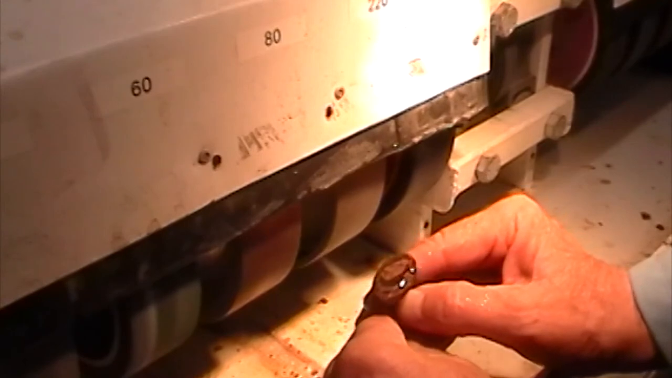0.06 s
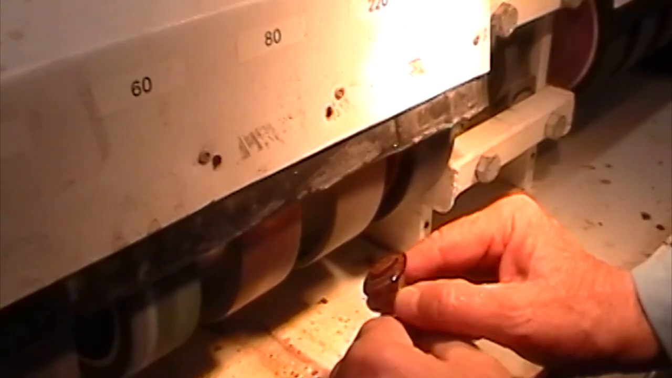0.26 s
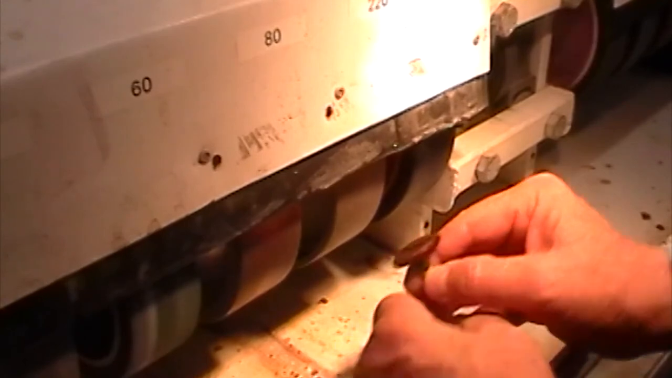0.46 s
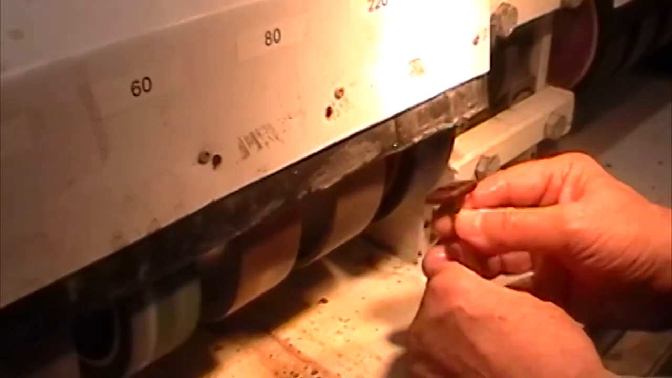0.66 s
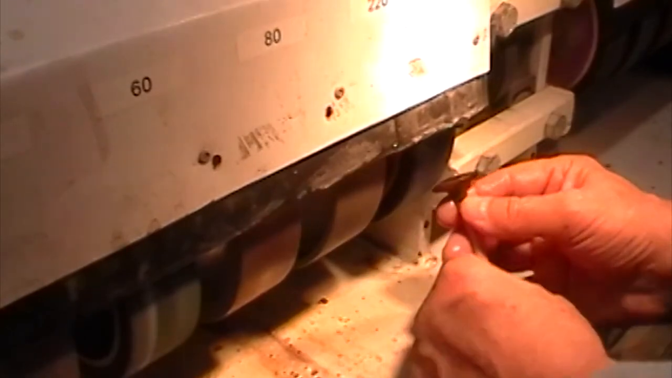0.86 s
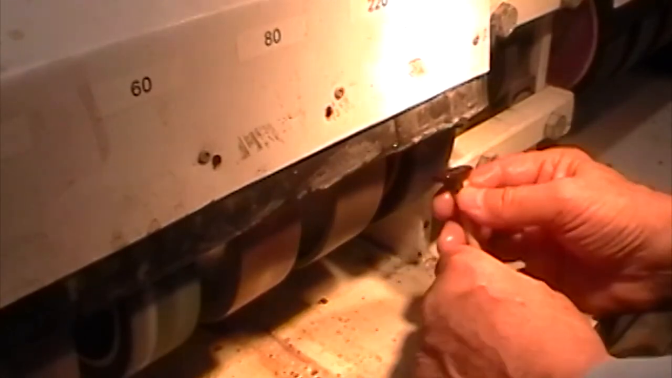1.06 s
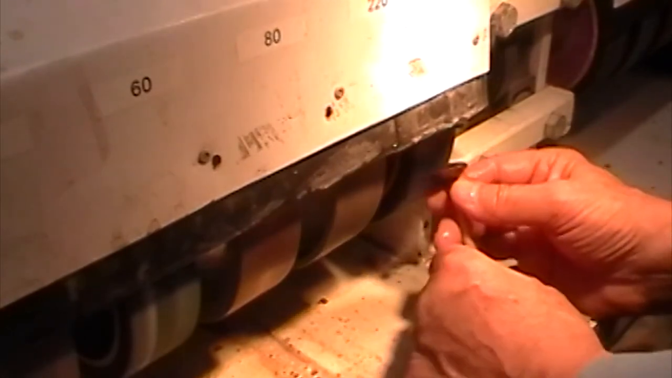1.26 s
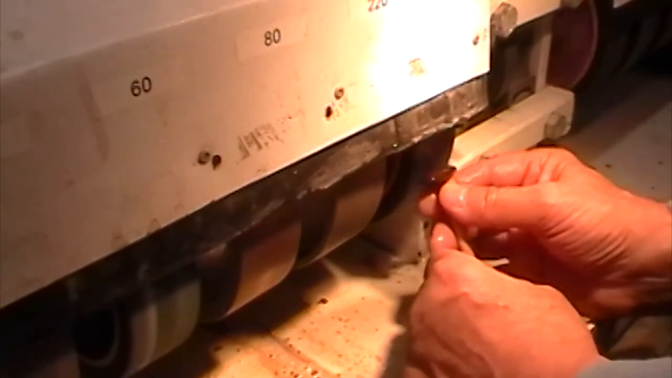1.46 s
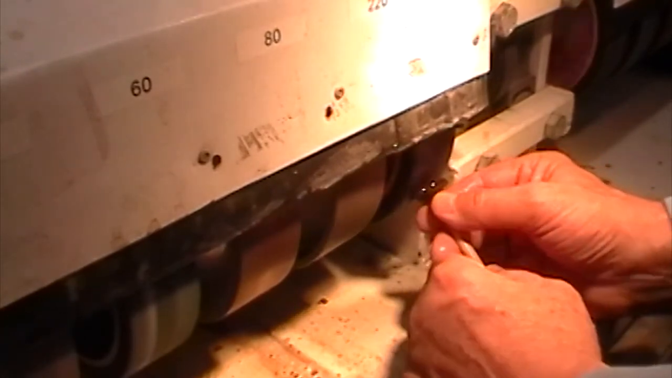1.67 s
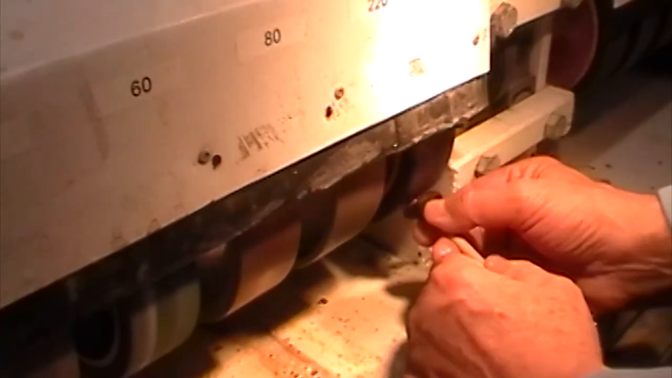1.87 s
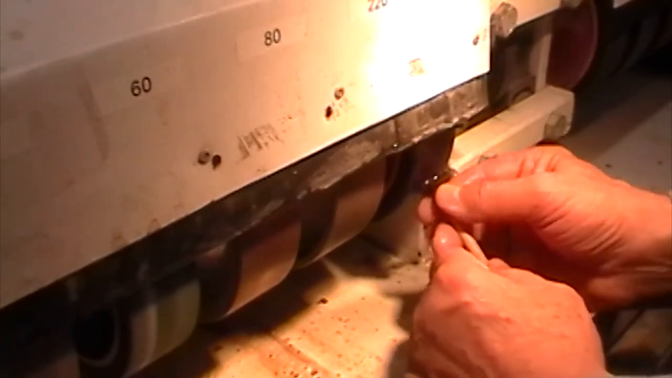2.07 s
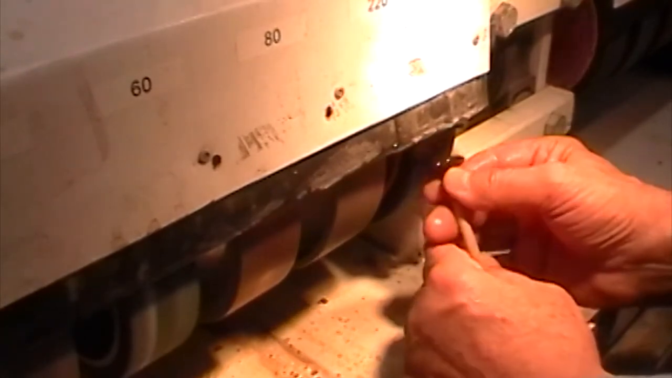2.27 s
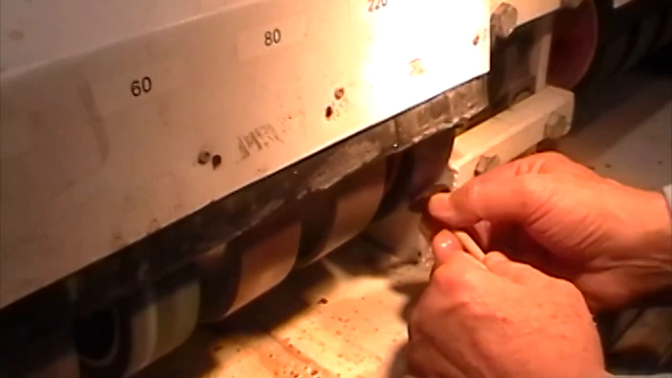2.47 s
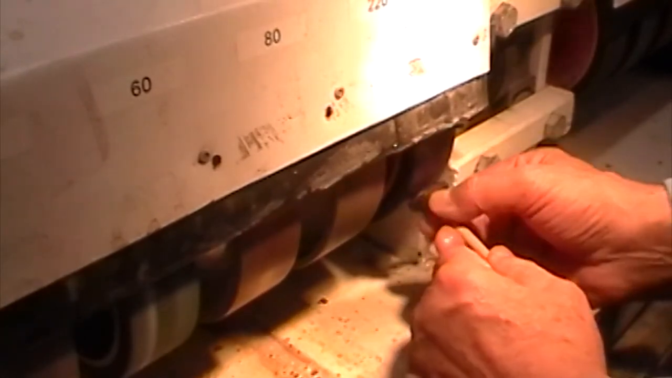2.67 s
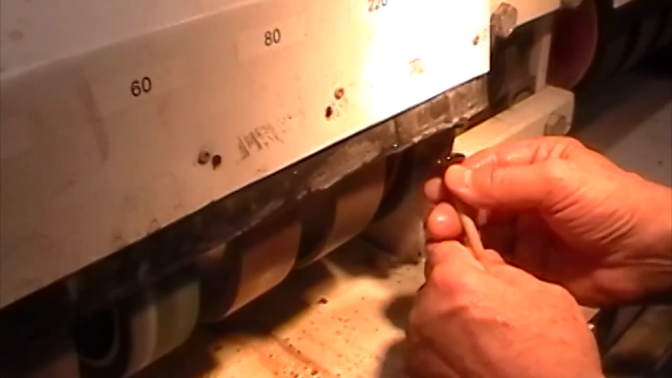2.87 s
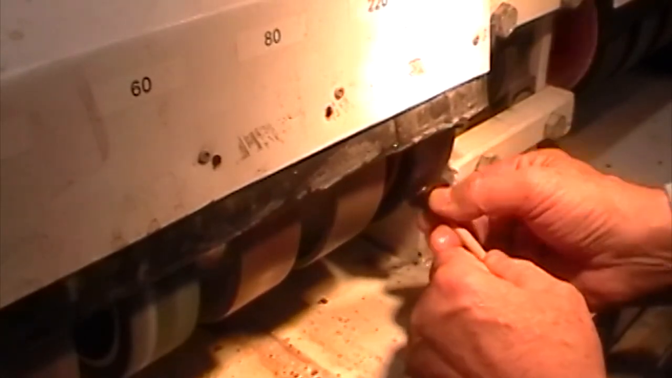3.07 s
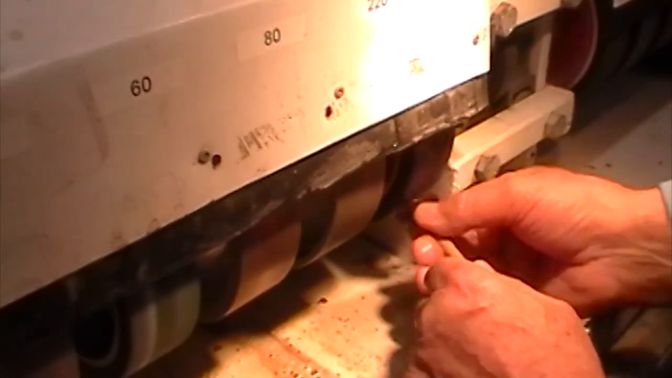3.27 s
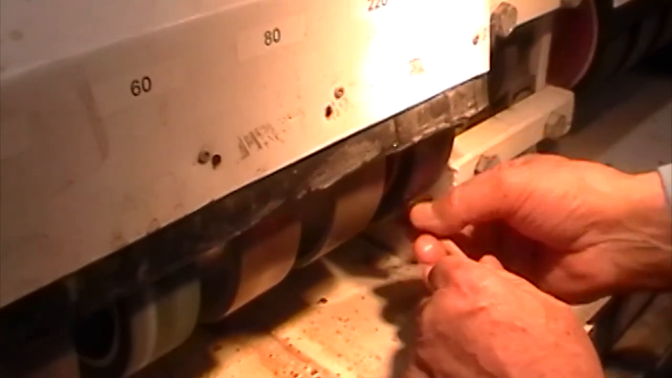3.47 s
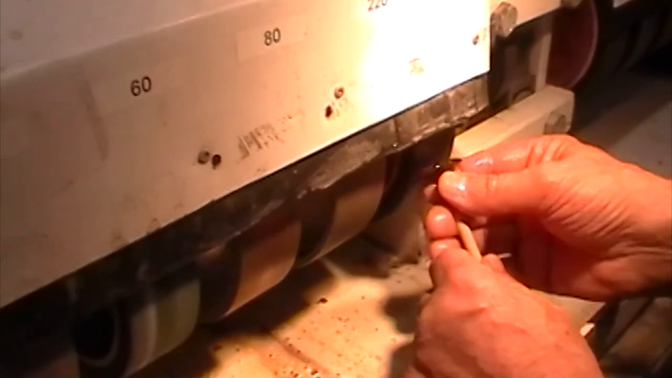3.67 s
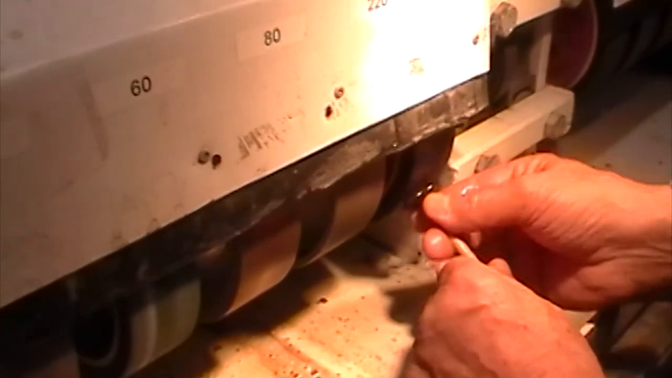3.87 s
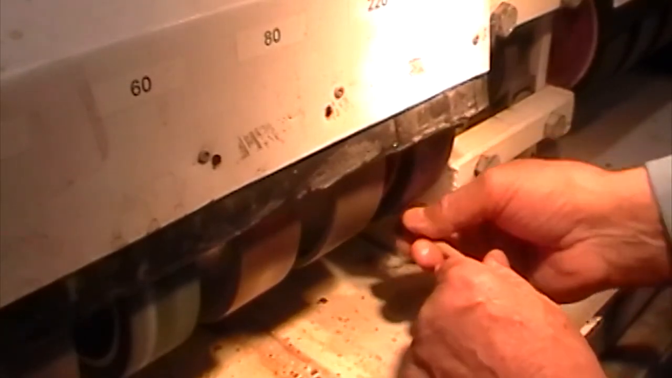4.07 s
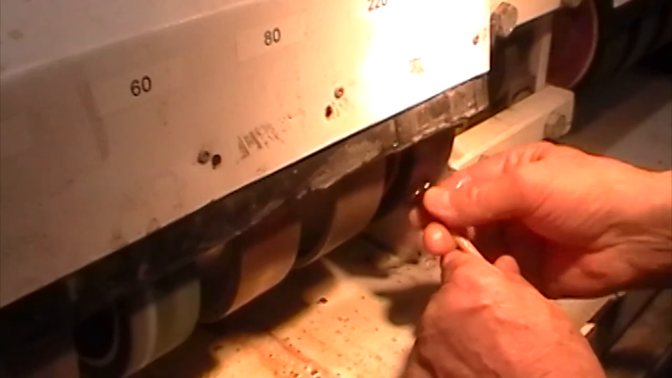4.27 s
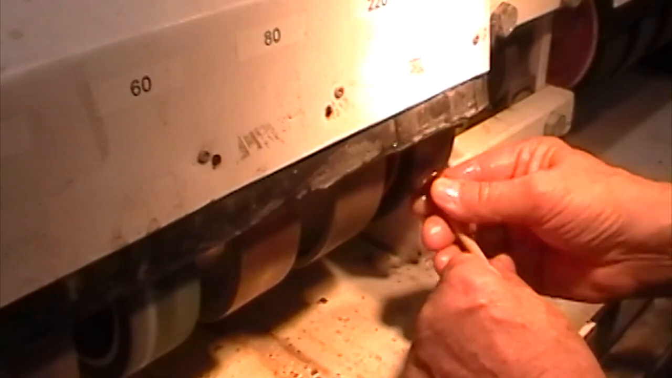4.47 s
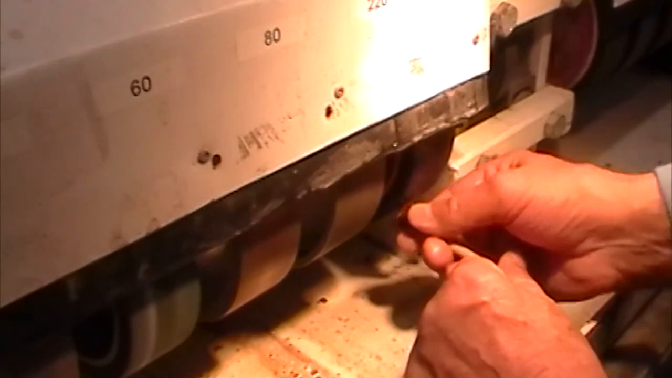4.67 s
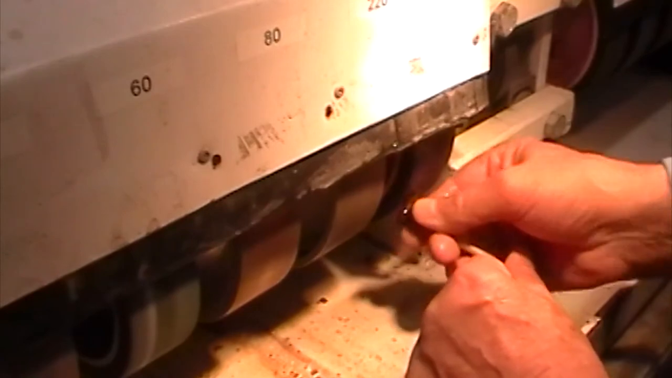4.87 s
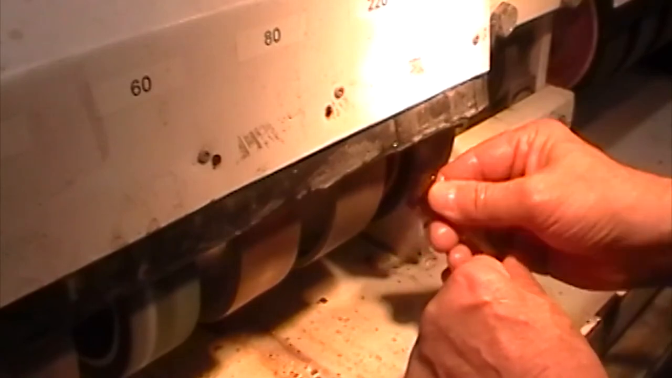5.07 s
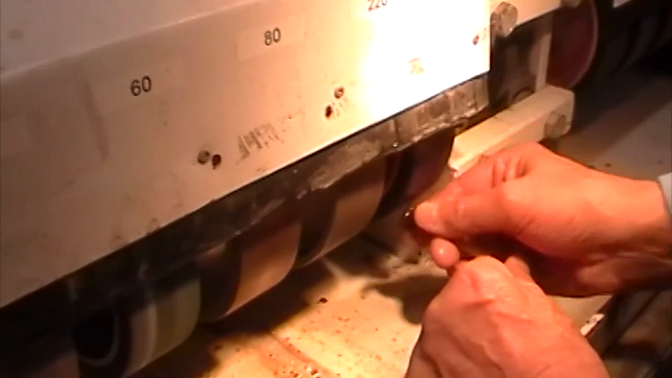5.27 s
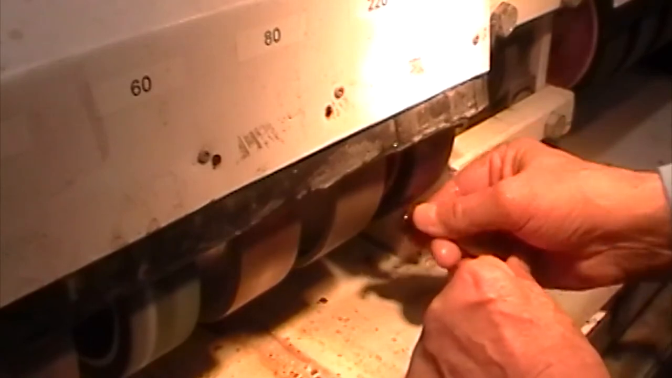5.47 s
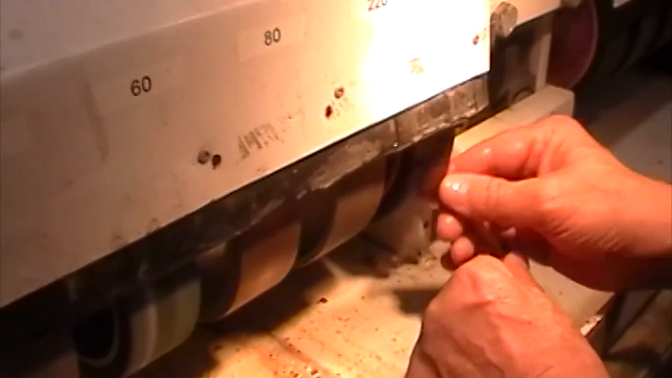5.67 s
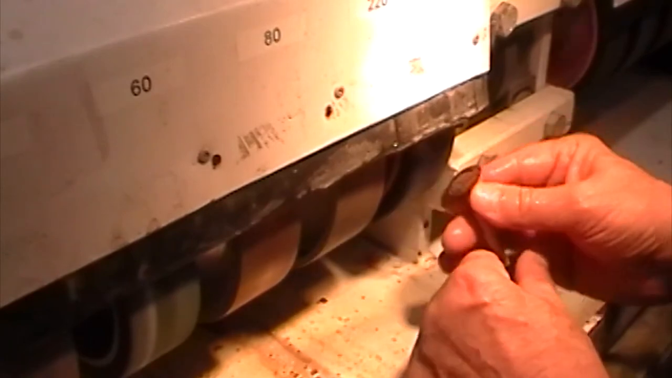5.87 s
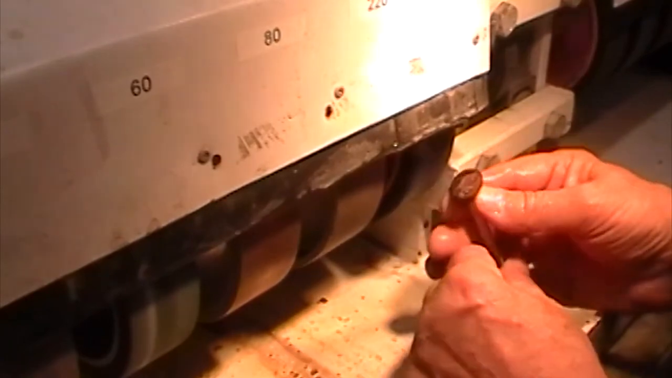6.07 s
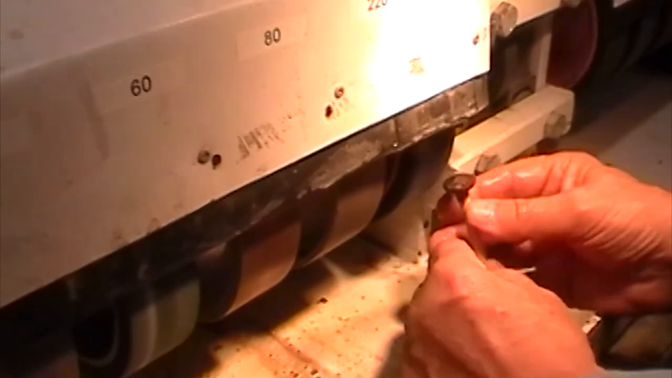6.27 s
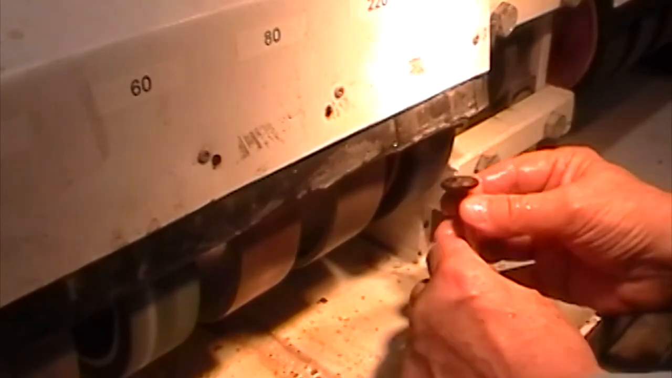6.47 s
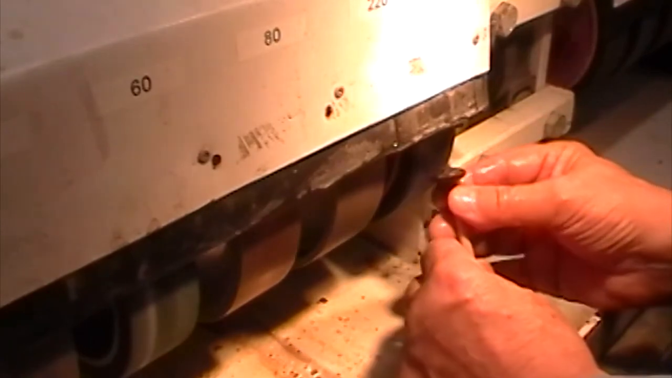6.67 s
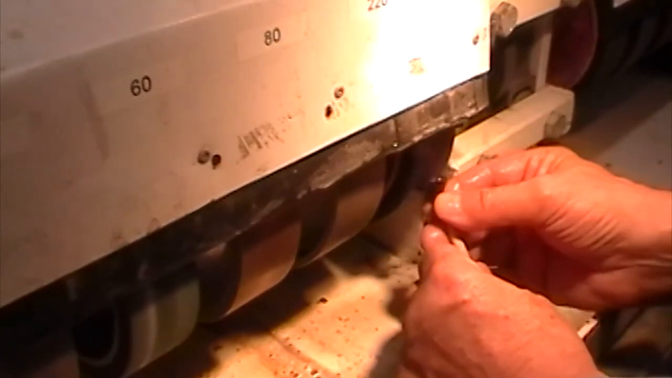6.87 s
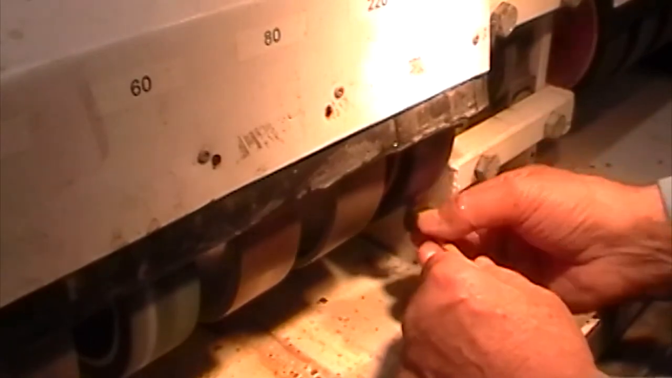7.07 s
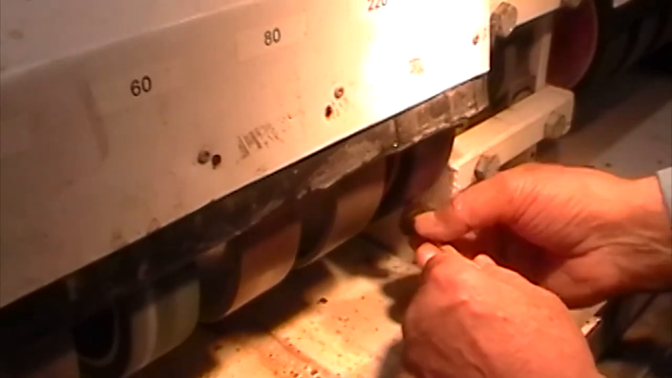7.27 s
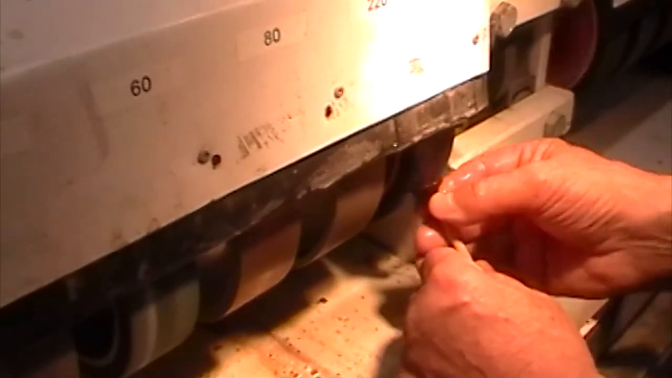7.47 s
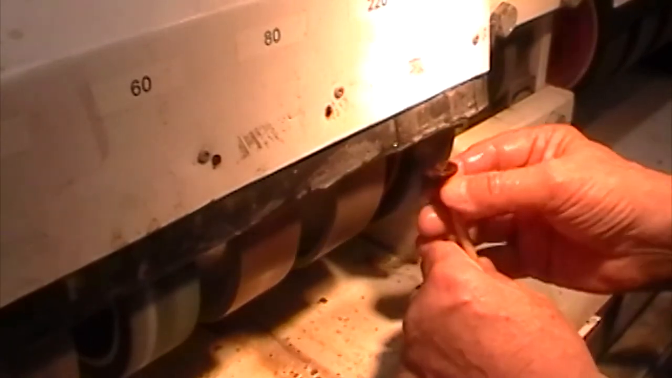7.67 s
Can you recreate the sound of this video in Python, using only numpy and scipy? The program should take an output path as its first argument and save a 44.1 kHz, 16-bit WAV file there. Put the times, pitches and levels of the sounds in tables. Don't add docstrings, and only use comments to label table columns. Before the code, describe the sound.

Wet stone grinding hisses loudly and harshly on a throbbing wheel over a low machine hum, pausing when lifted to faint spitting spray.

```python
import sys
import numpy as np
from scipy import signal
from scipy.fft import rfft, irfft
from scipy.io import wavfile
from scipy.ndimage import uniform_filter1d

SR = 44100
rng = np.random.default_rng(int(sys.argv[2]) if len(sys.argv) > 2 else 0)


def bounce(signal):
    frames = np.transpose(np.atleast_2d(signal))
    limited = np.clip(frames, -1, 1)
    pcm = np.round(limited * 32767).astype(np.int16)
    wavfile.write(sys.argv[1], SR, pcm)


def natural_amplitude(level_db):
    exponent = np.asarray(level_db, float) / 20
    return 10 ** exponent


N = 340452
TURN_HZ = 24.7


def evened(x):
    return x / np.sqrt(np.mean(x ** 2) + 1e-20)


def read(points, hz, axis=1):
    table = np.transpose(points)
    return np.interp(np.log(hz + 1), np.log(table[0] + 1), table[axis])


def body(peaks, broad, broad_db, size=16384):
    hz = np.fft.rfftfreq(size, 1 / SR)
    power = natural_amplitude(read(broad, hz) + broad_db) ** 2
    for peak_hz, width_hz, db in peaks:
        power = power + natural_amplitude(db) ** 2 / (1 + (2 * (hz - peak_hz) / abs(width_hz)) ** 2) ** 2
    log_gain = np.log(np.r_[power, power[-2:0:-1]] + 1e-12) / 2
    return np.fft.ifft(np.exp(np.conj(signal.hilbert(log_gain)))).real[:size // 2]


def ring(x, response):
    return signal.oaconvolve(x, response[None], axes=1)[:, :x.shape[1]]


def notch(hz, notch_hz, width_hz, depth):
    return 1 - min(depth, .97) / (1 + (2 * (hz - notch_hz) / width_hz) ** 2)


def wander(count, per_s):
    width = round(SR / per_s)
    return evened(uniform_filter1d(uniform_filter1d(rng.standard_normal(count), width), width))


def grit(count, per_s, spread_db, share):
    caught = rng.random(count) < per_s / SR
    size = natural_amplitude(spread_db * np.minimum(rng.exponential(1, count), 2.5)) * caught
    fine, sign = rng.standard_normal((2, 2, count))
    return fine + share * evened(size * np.sign(sign))


def add(mix, t, sound, start, end):
    at = np.round(t * SR).astype(int)
    keep = (t >= start) & (t < end) & (at < N)
    mix[:, at[keep]] += sound[:, keep]


# (level at its start [dB], level at its end [dB])
MACHINE_DB = [
    (-52, -51),
    (-49, -49),
    (-50, -51),
    (-48.5, -48.5),
    (-51.5, -52),
    (-48.5, -48.5),
]
# (frequency [Hz], width [Hz])
PANELS = [(177, 16), (250, 30), (290, 50), (340, 20), (425, 30), (490, 16), (668, 18), (706, 30), (760, 22),
          (860, 30), (937, 25), (1184, 25), (1292, 30), (1410, 25), (1631, 30), (1803, 30), (1930, 50),
          (2310, 40), (2790, 260), (3140, 110), (3370, 60), (4000, 40), (4290, 50), (4770, 200)]
PANELS_DB = [-6, -4, -3, -7, -10, -9, -5, -7, -9, -15, -33, -13, -15, -13, -13, -12.5, -14.5, -20.5, -18,
             -19, -18, -20, -24, -25]
# (frequency [Hz], level [dB])
RUMBLE = [(18, -90), (40, -37), (65, -23), (100, -14), (150, -14), (300, -4), (500, -9), (600, -18),
          (750, -7), (1400, -13), (2050, -16), (2500, -18), (4500, -21), (4900, -24), (5450, -28),
          (5750, -33), (6300, -33), (6800, -29), (7400, -33), (15700, -40)]
MOTOR_HZ = [88.2, 120, 123.4, 225.5, 300.5]
# (level re rumble [dB], pitch waver [Hz], level waver [dB])
MOTOR_WAVER = [(-25, .22, 1), (-21, .2, 1.5), (-18.5, .1, 1.5), (-12, 2.4, 3), (-14, 3.66, 2.5)]


def machine(start, end, db):
    t = np.arange(round(start * SR) - 9000, round(end * SR) + 600) / SR
    panels = [(hz, width_hz, level_db) for (hz, width_hz), level_db in zip(PANELS, PANELS_DB)]
    hum = evened(ring(rng.standard_normal((2, len(t))), body(panels, RUMBLE, -6.)))
    for hz, (tone_db, waver_hz, waver_db) in zip(MOTOR_HZ, MOTOR_WAVER):
        turns = np.cumsum(hz + waver_hz * wander(len(t), 8.73)) / SR
        phase = 2 * np.pi * (turns + rng.random((2, 1)))
        tone_gain = natural_amplitude(tone_db + waver_db * wander(len(t), 3.1))
        hum = hum + tone_gain * np.sqrt(2) * np.sin(phase)
    return t, natural_amplitude(np.interp(t, [start, end], db) + 2.0) * hum


# (start [s], end [s], puff onset [turns], timing spread [turns],
# unevenness [dB], steady mist [share])
SPRAYS = [
    (0, 1.648, .9, .09, 2., .6),
    (5.685, 6.887, .37, .03, 1.0, .2),
]
# (level [dB], tilt [dB per octave], broad fizz re the rings [dB])
SPRAY_DB = [(-60, -6, 0.), (-66, -2, -8)]
# (frequency [Hz], width [Hz], level [dB])
SPRAY_RING = [(7630, 54, -1), (7840, 49, -2), (8820, 90, -5), (9100, 40, -4), (9370, 65, -2),
              (9760, 37, -7), (10400, 88, -6), (11200, 54, -1), (11900, 45, -7), (12100, 120, -5),
              (12570, 90, 0), (12800, 46, -5), (13050, 120, -6), (13300, 45, -6), (14900, 40, -10)]
# (frequency [Hz], level [dB])
SPRAY_FIZZ = [(5000, -22), (6600, -13), (7300, -14), (7700, -4), (8700, -8), (9500, -5), (12500, -4),
              (13600, -7), (14300, -9), (15800, -7)]


def spray(start, end, onset, spread, uneven_db, mist, db, tilt_db, fizz_db):
    t = np.arange(round(start * SR), round(end * SR)) / SR
    turns = TURN_HZ * t - onset + spread * wander(len(t), 40.0)
    size = natural_amplitude(uneven_db * rng.standard_normal(400))[turns.astype(int) + 2]
    puff = size * np.exp(-((turns % 1) / .34) ** 2.6)
    flow = uniform_filter1d(puff, size=180) + mist
    fizz = [(hz, level_db + tilt_db * np.log2(hz / 8000)) for hz, level_db in SPRAY_FIZZ]
    drops = ring(flow * grit(len(t), 1500., 3.5, .4), body(SPRAY_RING, fizz, fizz_db))
    return t, natural_amplitude(db) * evened(drops)


# (time [s], peak level [dB], centre [Hz])
SPLASHES = [
    (0.0438, -54, 7870),
    (0.1885, -36, 13000),
    (0.285, -40, 13200),
    (0.5681, -50, 12600),
    (0.7652, -41, 11600),
    (0.871, -36, 9710),
    (1.5848, -39, 12400),
]


def splash(db, hz):
    t = np.arange(1500) / SR
    band = signal.butter(2, [0.87 * hz, min(1.3 * hz, 16000)], "band", fs=SR)
    fizz = signal.lfilter(*band, rng.standard_normal((2, 1500)))
    return natural_amplitude(db - 11) * evened(fizz) * np.minimum(t / .002, 1) * np.exp(-t / .009)


# (frequency [Hz], width [Hz], depth [0-1])
HOUSING = [(2530, 70, .6), (5710, 120, .82), (7250, 220, .55), (8350, 200, .3), (12400, 100, .4)]


def housing(x):
    hz = np.fft.rfftfreq(N, 1 / SR)
    shaded = np.prod([notch(hz, *dip) for dip in HOUSING], axis=0)
    return irfft(rfft(x, axis=1) * shaded, N, axis=1)


# (frequency [Hz], share [0-1])
RETURN = [(1500, .36), (4500, .34), (8000, .22), (13000, .15), (16000, .1)]


def come_round(x):
    turn_s = .04041
    hz = np.fft.rfftfreq(x.shape[1], 1 / SR)
    alike = read(RETURN, hz)
    comb = np.sqrt(1 - alike ** 2) / (1 - alike * np.exp(-2j * np.pi * hz * turn_s))
    return irfft(rfft(x, axis=1) * comb, x.shape[1], axis=1)


# (delay [s], share [signed ratio])
ECHOES = [(.0023, -.09), (.0034, .1), (.0047, .11), (.0061, -.12), (.0083, .12), (.0112, .11)]


def tray(x):
    taps = np.zeros(600)
    taps[0] = 1
    delay_s, share = np.transpose(ECHOES)
    taps[(delay_s * SR).astype(int)] = share
    return ring(x, taps)


# (time [s], half length [s], frequency [Hz], half width [Hz], level [dB])
TURNINGS = [(1.7, 0.21, 8650, 120, 12), (2.75, 0.36, 7700, 93, -8), (2.5, 0.49, 13900, 790, -7),
            (2.1, 0.67, 10000, 150, -6), (3.2, .3, 5730, 250, -2), (1.9, 0.27, 4000, 340, -6.5),
            (1.78, 0.13, 2320, 140, 10.5), (1.6, .1, 5000, 180, -1), (3.7, 0.25, 9500, 500, 2.5),
            (3.9, 0.15, 10000, 280, -8), (3.7, .4, 16000, 200, 2), (3.7, 0.32, 15150, 250, 5),
            (4.25, 0.15, 9940, 430, 2.5), (4.2, 0.13, 5900, 1300, -4), (4.4, 0.27, 5500, 150, -16),
            (4.7, 0.45, 6600, 120, -4), (5.2, .45, 4090, 120, -9), (5.4, 0.2, 7600, 200, 2),
            (5.24, .4, 8680, 170, 7.5), (4.4, 0.41, 7900, 200, -4), (4.98, 0.69, 9280, 1000, -7.5),
            (5.44, .15, 8050, 150, -6), (4.8, .25, 14300, 170, 4), (4.25, .2, 13700, 130, 5),
            (5.2, .4, 10600, 250, 2), (4.8, .5, 15000, 100, 2), (5.3, .4, 12660, 100, 6),
            (7.1, .2, 5690, 200, -14), (8.3, 0.45, 7500, 130, -1), (7.6, 0.44, 3870, 110, -4),
            (7.8, .25, 14000, 130, -4.5), (7.0, .2, 2650, 150, 0), (6.8, 0.56, 17000, 130, -7),
            (7, .5, 9500, 170, -11), (7.5, .2, 19000, 150, -7), (8, .3, 2400, 47, -8),
            (4.1, 0.22, 11900, 60, -9), (4.6, .4, 11050, 150, 1), (4.2, 0.19, 10150, 200, 4),
            (2.06, 0.096, 2600, 470, 6)]
# (time [s], half length [s], frequency [Hz],
# half width [Hz], level [dB])
MORE_TURNINGS = [(1.75, 0.12, 3800, 400, 5), (2.05, 0.14, 12200, 1500, 3), (2.9, 0.58, 8420, 130, -15),
                 (2.08, 0.095, 4800, 200, 3), (3.26, 0.088, 4930, 700, -2.5), (3.42, .06, 4900, 900, -0.5),
                 (3.97, 0.11, 4100, 150, 6), (4.4, 0.46, 7230, 120, -16), (5.0, .5, 11900, 60, 4),
                 (5.3, .4, 12400, 90, -8), (5.65, 0.079, 8700, 1200, 2.5)]


def drift(x, start, patchy_db, count=256):
    hz, t, z = signal.stft(x, SR, nperseg=2 * count)
    patch = uniform_filter1d(rng.standard_normal(z.shape[1:]), size=5, axis=0)
    patch = uniform_filter1d(uniform_filter1d(patch, size=40, axis=1), size=20, axis=1)
    gain_db = patchy_db * evened(patch)
    for at, half_s, centre_hz, width_hz, db in TURNINGS + MORE_TURNINGS:
        across = np.exp(-((hz - centre_hz) / width_hz) ** 2)
        along = np.exp(-((t + start - at) / half_s) ** 2)
        gain_db = gain_db + db * np.outer(across, along)
    return signal.istft(z * natural_amplitude(gain_db), nperseg=2 * count)[1][:, :x.shape[1]]


# (lead as it begins [turns], slip [turns per s])
LEADS = [(-.43, -.125), (-.58, -.72), (-1.44, .04), (-1.73, -.55)]
# (time [s], throb [dB], half length [s])
BOUNCES = [
    (2.2, 2.6, .22),
    (2.8, 1.3, .5),
    (3.28, .9, .1),
    (4.0, .7, .25),
    (4.2, 1.9, .11),
    (4.29, 2.6, .04),
    (4.8, 1.4, .09),
    (5.45, 1.2, .14),
    (7.66, 1, .1),
]


def throb(t, start, lead, slip):
    depth_db = .6
    for at, db, half_s in BOUNCES:
        depth_db = depth_db + db * np.exp(-((t - at) / half_s) ** 2)
    turn = 2 * np.pi * (TURN_HZ * t + lead + slip * (t - start))
    return depth_db * (np.cos(turn) + 0.23 * np.sin(2 * turn))


# (time [s], pressure as hiss level [dB], roll to second face [0-1], slack of grip [dB])
STROKES = [
    [(1.65, -35, 0.13, 15), (1.76, -32.5, 0.1, 6.5), (1.88, -34, 0.2, 3), (2.21, -34, 0.36, 3),
     (2.6, -30.5, 0.6, -4), (3.0, -31.5, 1, -1.5), (3.22, -31, 0.85, -5), (3.33, -32.5, 1, -1)],
    [(3.33, -34, 0.34, -4), (3.5, -36.5, 0.67, 1.5), (3.76, -35, 1, 2), (3.95, -32, 1, 1),
     (4.09, -35, 0.8, 7)],
    [(4.09, -35, 0.46, -3), (4.3, -38, 0.16, -1.5), (4.45, -34, 0.4, -2.5), (4.66, -34, 0.46, -6),
     (4.89, -35.5, 0.9, -0.5), (5.14, -36, 0.96, 2.5), (5.34, -34.5, 1, 2), (5.46, -36, 0.47, 3),
     (5.68, -36, 0, 3)],
    [(6.89, -37, 0, -0.5), (7.0, -35, 0.36, 1), (7.04, -36.5, 0.28, 1), (7.36, -36, 0.4, 3),
     (7.5, -33, 0.6, 1), (7.6, -35.5, 0.75, -4.5), (7.71, -34, 0.9, -7)],
]
# (top fizz [dB], stone ring [dB], stick ring [dB],
# low ring [dB], rim [dB], core hiss [dB], edge hiss [dB])
FACES = [((-3.5, -7, -24, -19.5, -10.5, -1.5, -3.5), (-10, -7.5, -21, -18, -15, -2.5, -10)),
         ((-12, -8, -25, -22, -12, -1.8, -9), (-5.5, -19.5, -22, -18, -14, -1.2, -9)),
         ((-1.5, -3, -16.5, -14, -11, -2, -4.5), (-1.8, -11.5, -21.5, -13, -11.5, -2.5, -5)),
         ((-0.5, -3.5, -13, -8, -11, 0.5, -9.5), (-4.5, -7.5, -16.5, -20, -11.5, -2.5, -3.5))]
# (low edge [Hz], high edge [Hz])
BAND_EDGES_HZ = [(11400, 17000), (4150, 5700), (1500, 3200), (3200, 4150), (5700, 7300), (7300, 10200),
                 (10200, 11400)]
SLACK_SHARE = (0.025, 0.17, 0.88, 0.36, -0.0017, -0.054, -0.13)
THROB_SHARE = (0.81, 0.9, 0.36, .55, 0.71, 1, 0.88)
# (frequency [Hz], width [Hz], level [dB])
RING_FIRST = [(2360, 150, -2), (3630, 90, -9), (3880, 80, -10), (4190, 70, -4), (4550, 60, -5),
              (4790, 200, 1), (5230, 160, -3), (5510, 72, -7), (6310, 190, -10), (6830, 50, -13),
              (7100, 98, -14), (7480, 32, -9), (7620, 180, -6), (8060, 120, -5), (8660, 160, -7),
              (9170, 130, -5), (9690, 130, 0), (10200, 140, -5), (10500, 30, -5), (10600, 25, -5),
              (10900, 29, -5), (11100, 77, -6), (11300, 34, -8), (11800, 130, -7), (12200, 93, -8),
              (12800, 280, -12), (13080, 90, -10), (13950, 140, -11), (14300, 170, -13), (15100, 150, -6)]
# (frequency [Hz], width [Hz], level [dB])
RING_SECOND = [(1800, 60, -6), (2310, 110, -10), (3840, 50, -5), (4100, 70, 1), (4570, 27, -4),
               (4830, 71, -3), (6300, 290, -14), (7250, 53, -10), (7490, 36, -5), (7680, 72, -6),
               (8080, 66, -3), (8660, 160, -4), (9250, 110, -2), (9730, 100, 0), (10100, 86, -4),
               (10300, 46, -7), (10600, 37, -7), (11100, 110, -7), (11700, 51, -8), (11900, 26, -3),
               (12100, 160, -14), (12700, 150, -11), (13600, 270, -8), (14100, 74, -10), (14500, 62, -9),
               (14700, 54, -9), (15100, 57, -6)]
# (frequency [Hz], width [Hz], level [dB])
RING_THIRD = [(1810, 210, -10), (2300, 56, -11), (3120, 100, -10), (3720, 200, -3), (4200, 40, -4),
              (4820, 150, 2), (5450, 150, -8), (6060, 120, -9), (6910, 190, -11), (7490, 36, -2),
              (7620, 31, -4), (8060, 130, -4), (8660, 84, -6), (9180, 84, -5), (9430, 120, -6),
              (9670, 110, -5), (10200, 63, -4), (10700, 110, -2), (11000, 71, 0), (11600, 25, -5),
              (11900, 30, 0), (12200, 84, -6), (12700, 100, -5), (13100, 270, -8), (13800, 150, -4),
              (14300, 130, -4), (15200, 46, -3), (15700, 99, -13)]
# (frequency [Hz], width [Hz], level [dB])
RING_LAST = [(2340, 230, -8), (4180, 62, -8), (3560, 150, -11), (3850, 80, -10), (4420, 30, -5),
             (4580, 100, -3), (4820, 150, 0), (5070, 50, -1), (5340, 150, -7), (6060, 60, -10),
             (6250, 130, -8), (6830, 39, -11), (7060, 64, -9), (7480, 27, -3), (7750, 100, -5),
             (8690, 180, 0), (9150, 160, -4), (9680, 94, -2), (10100, 56, -5), (10500, 53, -3),
             (11000, 51, -4), (11900, 34, -3), (12100, 39, -7), (12600, 120, -8), (13100, 210, -6),
             (13500, 110, -7), (13900, 100, -6), (14500, 210, -6), (14800, 31, -9), (15100, 52, -1),
             (15600, 120, -11)]
# (low [dB], middle [dB], high [dB])
RING_DB = [(-17, -3, -.1), (-7, -16, -.1), (-18.5, -10, -.1), (-1, 0, -.1)]
# (frequency [Hz], width [Hz])
WHEEL = [(7487, 13), (11900, 10), (12080, 24), (15059, 30), (15169, 30)]
WHEEL_DB = [(-6, -6, -8, -2, -2), (-2, 0, -9, -3, -5), (0, 3, -6, -1, 0), (-1, 0, -4, 1, -3)]
# (frequency [Hz], level [dB per Hz])
SCRATCH = [(880, -63), (1500, -20), (1860, -13), (3320, -13.5), (4830, -2), (5760, -7), (7080, -9),
           (7510, -5), (8620, -3), (9420, 1.5), (12900, -4.5), (14700, -2), (15700, -13)]
# (frequency [Hz], width [Hz], depth [0-1])
HAND_SHADE = [(5750, 130, 0.6), (5760, 320, 0.5), (5720, 100, .3), (5670, 110, .65)]
# (frequency [Hz], width [Hz], depth [0-1])
HOOD_SHADE = (18000, 160, .6)


def grind(strokes, faces, lead, peaks, ring_db, wheel_db, hand_shade):
    s, hiss_db, roll, slack_db = np.transpose(strokes)
    t = np.arange(round(s[0] * SR) - 4000, round(s[-1] * SR) + 900) / SR
    throb_db = throb(t, s[0], *lead)
    contact = natural_amplitude(0.11 * wander(len(t), 43.0) + 0.18 * wander(len(t), 330.0))
    grains = contact * come_round(grit(len(t), 1100., 4.5, .62))

    modes = []
    for hz, width_hz, db in peaks:
        damping = 1.7 if hz < 5700 else 1
        trim_db = ring_db[(hz > 3000) + (hz > 5700)]
        modes.append((hz, width_hz * damping, db + trim_db))
    modes += [(hz, width_hz, db) for (hz, width_hz), db in zip(WHEEL, wheel_db)]
    rung = ring(tray(grains), body(modes, SCRATCH, -6.5))

    hz = np.fft.rfftfreq(len(t), 1 / SR)
    spectrum = rfft(drift(rung, t[0], patchy_db=.6), axis=1)
    spectrum = spectrum * notch(hz, *hand_shade) * notch(hz, *HOOD_SHADE)
    out = 0
    for (low, high), first_db, second_db, slack_share, throb_share in zip(
            BAND_EDGES_HZ, *faces, SLACK_SHARE, THROB_SHARE):
        band = np.clip(np.minimum(hz - low, high - hz) / 500 + .5, 0, 1)
        part = irfft(spectrum * band, len(t), axis=1)
        grip_db = first_db + (second_db - first_db) * roll + slack_share * slack_db
        level = natural_amplitude(np.interp(t, s, hiss_db + grip_db))
        out = out + level * evened(natural_amplitude(throb_share * throb_db) * part)
    return t, out


CUTS = [
    0,
    1.648,
    3.33,
    4.092,
    5.685,
    6.887,
    7.73,
]


def scene():
    mix = np.zeros((2, N))
    for db, start, end in zip(MACHINE_DB, CUTS, CUTS[1:]):
        add(mix, *machine(start, end, db), start, end)
    for flow, balance in zip(SPRAYS, SPRAY_DB):
        add(mix, *spray(*flow, *balance), 0, CUTS[-1])
    for s, db, hz in SPLASHES:
        add(mix, s + np.arange(1500) / SR, splash(db, hz), 0, CUTS[1])
    mix = housing(mix)
    rings = [RING_FIRST, RING_SECOND, RING_THIRD, RING_LAST]
    takes = [1, 2, 3, 5]
    for *hold, take in zip(STROKES, FACES, LEADS, rings, RING_DB, WHEEL_DB, HAND_SHADE, takes):
        add(mix, *grind(*hold), CUTS[take], CUTS[take + 1])
    return mix


def band_limit(x):
    return signal.sosfilt(signal.butter(12, 16870, fs=SR, output="sos"), x)


# (frequency [Hz], unrelated side [dB], lean to the left [ratio], lag of the left port [ratio])
PAIR = [(35, 2, .05, .4), (70, -18, 0.043, 0.43), (120, -33, 0.01, 0.31), (200, -32, -.08, 0.29),
        (304, -20, -0.17, .07), (430, -6, -0.14, .22), (685, -14, -0.096, .07), (1450, -15.5, 0.012, .01),
        (2800, -42, -0.067, 0.036), (4000, -45, -.005, .002), (5400, -39.5, -0.004, .001),
        (9900, -32.5, 0.016, .001), (12200, -11.5, 0.055, .03), (15500, -5, 0.079, .2)]


def record(dry):
    edge_hz = 15785
    hz = np.fft.rfftfreq(N, 1 / SR)
    mid, twin = rfft(dry, axis=1)
    lean, lag = read(PAIR, hz, axis=2), read(PAIR, hz, axis=3)
    side = natural_amplitude(read(PAIR, hz)) * twin + (lean - 1j * lag) * mid
    band = np.clip((edge_hz - hz) / 120 + .5, 0, 1) ** 2
    mix = irfft(band * np.array([mid + side, mid - side]), N, axis=1)
    return band_limit(mix)


dry = scene()
out = record(dry)
bounce(out)
```